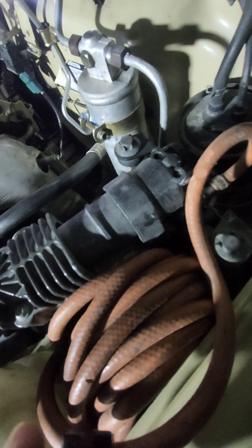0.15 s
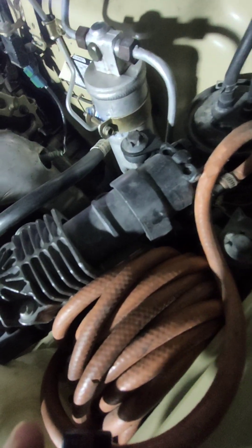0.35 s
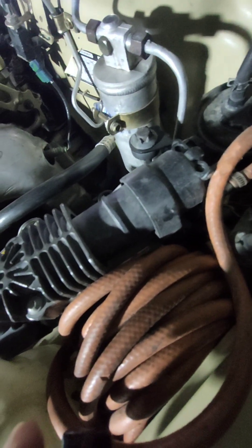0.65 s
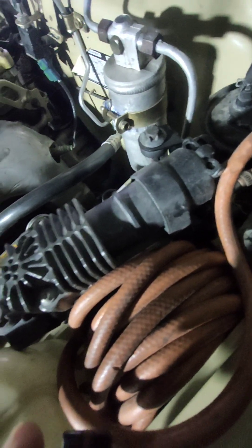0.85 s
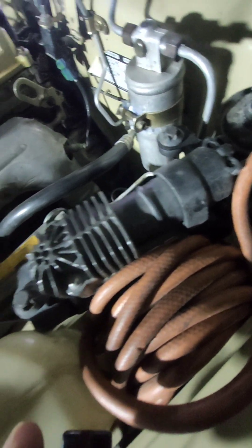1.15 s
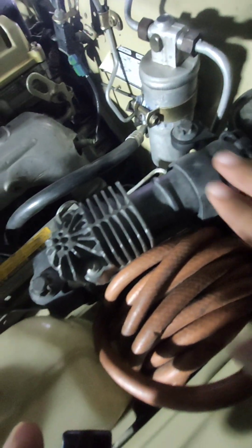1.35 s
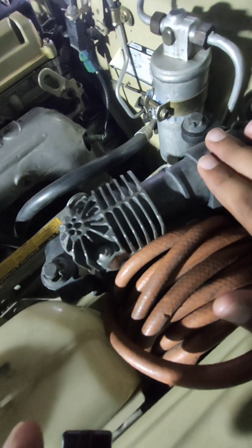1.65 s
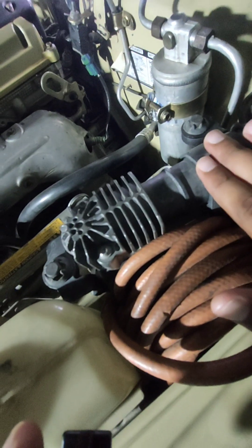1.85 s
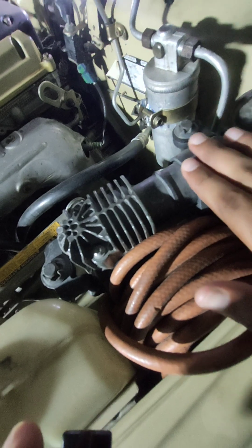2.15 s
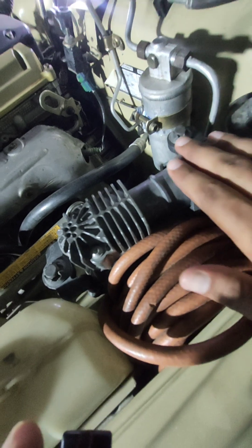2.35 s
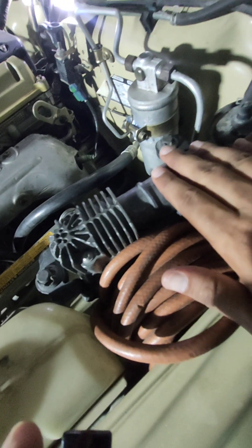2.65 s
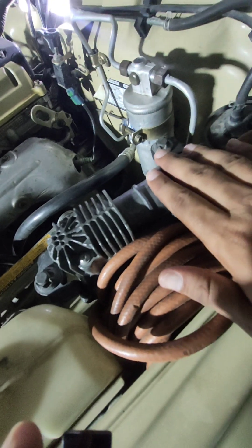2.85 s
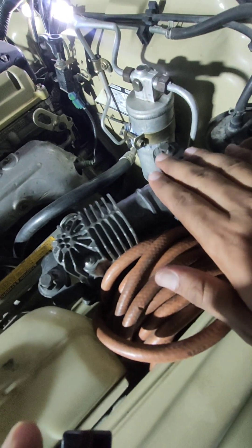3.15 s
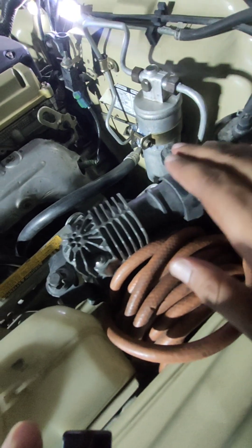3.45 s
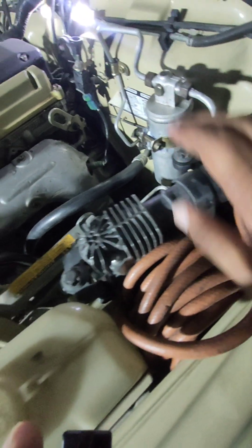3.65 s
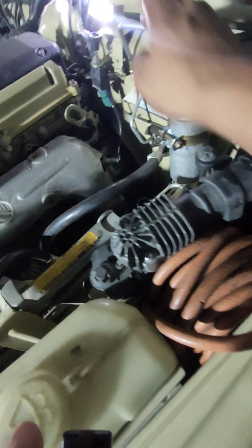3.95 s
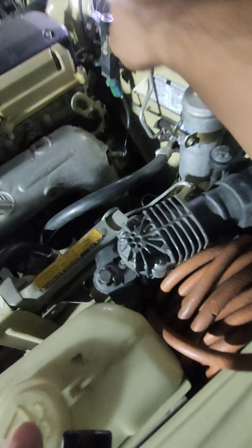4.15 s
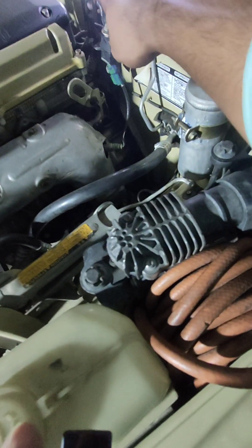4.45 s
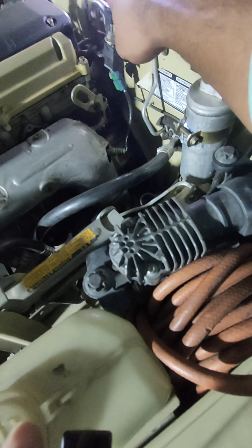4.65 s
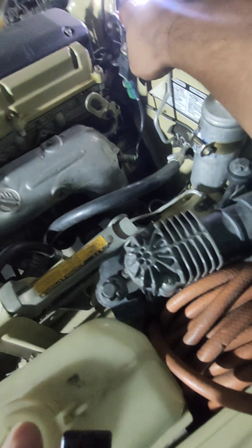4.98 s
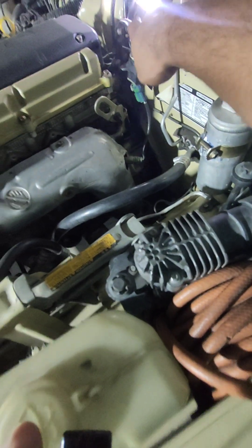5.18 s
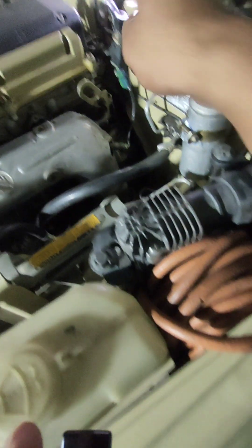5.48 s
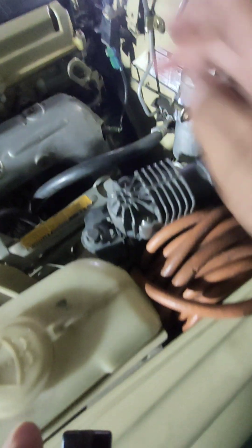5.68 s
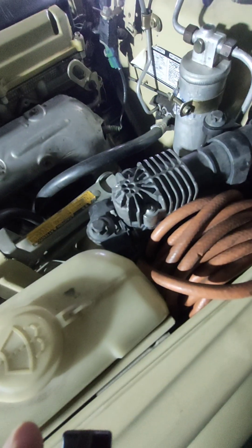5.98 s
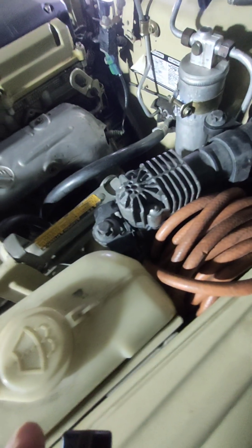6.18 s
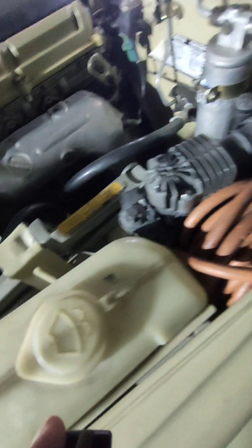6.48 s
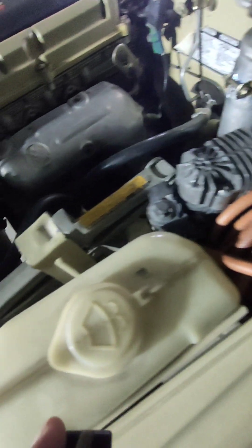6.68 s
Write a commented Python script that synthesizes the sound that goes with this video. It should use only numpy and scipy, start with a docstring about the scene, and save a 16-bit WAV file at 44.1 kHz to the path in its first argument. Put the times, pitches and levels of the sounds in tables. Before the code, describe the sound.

Loud air hiss over the rapid chugging buzz of a small compressor, cutting off with a soft thud into a quiet garage.

```python
"""A small electric piston compressor runs in a car's engine bay in a garage, heard from close above.
Its valves give a double puff on every turn, exciting the resonances of the pump head; the motor hums
and the casing rattles over a low throb. Escaping air makes a loud turbulent hiss that rings the metal.
After five seconds the pump stalls with a soft thud and the hiss shuts off, leaving a few small
handling sounds, a far engine and the faint noise of the garage."""
import sys
import numpy as np
from scipy import signal
from scipy.fft import rfft, irfft, next_fast_len
from scipy.io import wavfile

SR = 44100
rng = np.random.default_rng(int(sys.argv[2]) if len(sys.argv) > 2 else 0)


def transcribe(signal):
    """Save signal, clipped to [-1, 1], as a 16-bit WAV file at the path in sys.argv[1]."""
    frames = np.atleast_2d(signal).T
    limited = np.clip(frames, -1, 1)
    pcm = np.round(limited * 32767).astype(np.int16)
    wavfile.write(sys.argv[1], SR, pcm)


N = 300762
TIME = np.arange(N) / SR
HZ = np.maximum(np.fft.rfftfreq(N, 1 / SR), 1)
STALL_S = 4.87
GEAR_RATIO = 3.365  # motor turns per crank turn
PORT_LAG_S = .00014  # sound reaches the microphone's left port first


# Crank speed before the run-down: time_s, speed_hz
CRANK_SPEED = [(0.0, 43.443), (0.3, 43.616), (0.62, 43.551), (1.0, 43.992), (1.4, 44.14), (1.9, 43.973),
               (2.45, 44.113), (3.1, 44.109), (3.55, 44.241), (3.95, 44.482), (4.25, 44.388),
               (4.45, 45.023), (4.65, 45.43), (4.87, 44.713)]

def compressor(coast_s=0.096, puff_coast_s=0.088, start_turn=.122):
    """Periodic forcing: one crank times valves and casing; its speed decays exponentially at the stall."""
    effort = np.exp(-since(STALL_S) / coast_s)
    turns = start_turn + np.cumsum(effort * in_time(CRANK_SPEED)[0]) / SR
    puff_fade = np.exp(-(since(STALL_S) / puff_coast_s) ** 2)
    valves = amp(heard_db(-37.5, falloff=1)) * valve_puffs(turns) + valve_snaps(turns)
    return puff_fade * valves + effort * (casing(turns) + throb()) + stall_thud() + air_jet(turns)


# Modes of the pump head: centre_hz, width_hz, level_db, pan_db
HEAD_MODES = [(1022, 31, -19, 9.5), (1375, 145, -3.5, 14.5), (1600, 140, -1, 1), (1804, 1100, -10, 20.5),
              (1885, 115, -.5, 13), (1978, 206, -8.5, -7.5)]
# Cavities between pump, panels and a reaching arm: peak_s, spread_s, centre_hz, width_hz, level_db, pan_db
CAVITIES = [(.8, 0.32, 1850, 220, -15, -25), (3.5, 0.75, 1446, 300, -13.5, 7),
            (3.947, 0.45, 1994, 200, -9, 6), (4.11, 0.23, 1105, 35, -12.5, 2),
            (4.5, 0.32, 1182, 70, -14, 10), (4.7, 0.61, 1280, 131, -3.5, 5),
            (4.701, 0.21, 2074, 169.7, -7, -4)]

def valve_puffs(turns, gap_s=0.001735, jitter_s=.000014, uneven_db=0.5):
    """Impulse excitation: two opposite puffs per turn ring head and cavities, and echo round the bay."""
    strokes = TIME[1:][np.diff(np.floor(turns)) > 0]
    chance = rng.standard_normal((len(strokes), 4))
    puffs = np.zeros(N)
    for k, (lead_s, sign) in enumerate([(gap_s, -1), (0, 1)]):
        at = ((strokes - lead_s + jitter_s * chance[:, k]) * SR).astype(int)
        puffs[at] += sign * amp(uneven_db * chance[:, k + 2])
    puffs += air_rasp(puffs, strength=0.025, decay_s=0.0014)
    puffs = cut(cut(puffs, 1460, "high", order=5), 2100, "low", order=4)
    head = unit(sum(pan(side) * amp(db) * unit(resonate(puffs, hz, width))
                    for hz, width, db, side in HEAD_MODES))
    for peak_s, spread_s, hz, width, db, side in CAVITIES:
        cavity = resonate(resonate(puffs, hz, width), hz, width)
        head += amp(db) * swell(peak_s, spread_s) * unit(pan(side) * cavity)
    head[1] = np.interp(TIME - PORT_LAG_S / 2, TIME, head[1])
    return unit(head + amp(-8) * echoes(head, t60_s=0.074, delay_s=0.0011))


# Modes of the outlet valve: centre_hz, width_hz, level_db, pan_db, lead_s
VALVE_MODES = [(2610, 1430, -49.5, 13, 0.00101), (2714, 260, -48.5, -18, 0.000065),
               (3890, 1100, -47, -9, .0006)]

def valve_snaps(turns, uneven_db=0.5):
    """Impact: the outlet valve snaps shut once a turn and rings, with a short spit of air."""
    closings = np.diff(np.floor(turns), prepend=0) * amp(uneven_db * rng.standard_normal(N))
    closings += air_rasp(closings, strength=0.11, decay_s=.0006)
    out = 0
    for hz, width, db, side, lead_s in VALVE_MODES:
        ring = resonate(resonate(closings, hz, width), hz, width)
        out += amp(db) * unit(pan(side) * np.interp(TIME + lead_s, TIME, ring))
    facing_db = 5.5 * swell(3.48, 0.13)  # the microphone briefly faces the pump head
    return out * amp(heard_db(facing_db, falloff=1.2))


def air_rasp(pulses, strength, decay_s):
    """Flow noise: an exponentially decaying burst of air follows each pulse."""
    envelope = signal.lfilter([1], [1, -np.exp(-1 / (decay_s * SR))], abs(pulses) + 1e-18)
    return strength * rng.standard_normal(N) * envelope


# Shaking of the casing: crank_harmonic, level_db
SHAKE_HARMONICS = [(3, -1.5), (4, -3), (5, -1.5), (6, 0), (7, -3), (8, -13.5), (9, -9), (10, -1.5),
                   (11, -6), (12, -5.5), (13, -3.5), (14, -13.5), (15, -7)]
# Rattle of loose parts: frequency_hz, density_db
RATTLE_SPECTRUM = [(30, -15), (75, -12.5), (115, -7), (150, -4), (200, -11), (310, 3.5), (420, -5.5),
                   (540, -7.5), (720, -7.5), (1100, -24)]
# A rough resonance of the casing: centre_hz, width_hz, level_db, pan_db
CASING_MODE = (348.5, 83, -1.5, 10.5)

def casing(turns, hum_rise_s=0.089):
    """Forced vibration: the crank shakes the casing, the geared motor hums, loose parts rattle."""
    shake = sum(amp(db + 2 * drift(3.73)) * np.sin(2 * np.pi * (k * turns + rng.random()))
                for k, db in SHAKE_HARMONICS)
    rotor_phase = 2 * np.pi * GEAR_RATIO * turns + 0.201 * drift(4)
    hum_db = heard_db(-43.5, falloff=8.4) - 10 * np.exp(-TIME / hum_rise_s)  # strong only very close
    hum = amp(hum_db + drift(2.97)) * np.sin(rotor_phase)
    overtone = amp(-3 + 1.24 * drift(7.1)) * np.sin(2 * rotor_phase)
    rattle = amp(-3) * coloured(RATTLE_SPECTRUM)
    buzz = amp(heard_db(-48, falloff=0.96)) * (overtone + rattle)
    body = amp(heard_db(-53.5, falloff=4)) * ringing_noise([CASING_MODE], coherence=0.94)
    return pan(1.7) * (hum + amp(-60.5) * shake + buzz + body)


# Rocking of the pump on its feet: pitch_hz, level_db
ROCKING_MODES = [(158, -47), (262, -45)]
# Thud of the stopping pump: frequency_hz, density_db
THUD_SPECTRUM = [(60, -37), (115, -12), (158, -6), (205, -4), (262, -1), (310, 1), (450, -8), (1000, -13),
                 (2500, -42)]

def stall_thud():
    """Reaction force: the stopping piston rocks the pump on its feet with a soft thud."""
    rocking = sum(amp(db) * np.sin(2 * np.pi * (hz * TIME + rng.random())) for hz, db in ROCKING_MODES)
    return swell(4.958, 0.031) * (rocking + amp(-43.5) * coloured(THUD_SPECTRUM))


# Broad hiss of the jet: frequency_hz, left_db, right_db
JET_SPECTRUM = [(100, -41.5, -39), (861, -24, -21), (1270, -13.5, -15.5), (1950, -8.5, -5.5),
                (2330, -9.5, -10), (2700, -5.5, -3.5), (3200, -4.5, -5.5), (3600, -9, -1), (4100, -5.5, -3),
                (4850, -6, -5), (6200, -6.5, -10.5), (7800, -7, -13.5), (10140, -2, -12.5),
                (10800, -8, -21), (12600, -13.9, -19), (13640, -17.5, -18), (15600, -15.5, -17.5)]

def air_jet(turns, sag_s=4.96, sag_db_per_s=60, shut_s=5.025, shut_db_per_s=1600, coherence=0.34):
    """Turbulence: escaping air hisses, lightly chopped by the motor, until the flow sags and shuts off."""
    broad = amp(heard_db(-31.5, falloff=1)) * noise(spectrum_gain(JET_SPECTRUM), coherence, PORT_LAG_S)
    hiss = panel_reflections(broad + metal_resonances(coherence))
    flow_db = -sag_db_per_s * since(sag_s) - shut_db_per_s * since(shut_s)
    flutter_db = 0.62 * drift(74)
    chop_db = 0.8 * np.sin(2 * np.pi * GEAR_RATIO * turns)
    hiss *= amp(flow_db + flutter_db + chop_db)
    # the middle of the hiss lingers in the metal
    metal = resonate(rng.standard_normal(N), hz=4030, width_hz=2600)
    metal = unit(cut(metal, 6500, "low", order=4))
    return hiss + echoes(amp(-48 + flow_db) * metal, t60_s=0.42, delay_s=0.00275)


# Modes of the metal round the jet: centre_hz, width_hz, level_db, pan_db, falloff
METAL_MODES = [(3700, 430, -39, 6, 0.4), (4160, 530, -33.5, -15.5, 1.5), (5260, 323, -30.5, -21.5, 1),
               (5666, 460, -33.5, -18.5, -0.96), (6740, 338, -35.5, 16, 9.5), (7460, 481, -34.5, 9, 3),
               (8220, 690, -28.0, 24, 4), (8850, 283, -27.5, 20.5, 3.5), (9295, 299, -31, 22.5, 3)]
# Resonances that pass as microphone and hand move:
# peak_s, spread_s, centre_hz, glide_hz_per_s, width_hz, level_db, pan_db
PASSING_MODES = [(0.311, 0.475, 4140, -76.5, 252, -32.5, -8.5), (0.61, 0.48, 3636, -70, 327, -37.5, -2.5),
                 (0.629, 0.67, 6150, 96.5, 752, -30.5, 14), (1.11, 0.3, 8340, -158, 443, -26, 27.5),
                 (1.611, 0.6, 4510, -12, 152, -33.5, -4.5), (1.72, 0.407, 7310, -72, 287, -36.5, 5.5),
                 (1.771, 0.36, 6450, -32, 158, -46.5, -4), (1.819, 0.7, 5690, 50, 373, -29.5, -24),
                 (2.03, 0.37, 8140, -88, 242, -27.5, 30), (2.78, 0.41, 9080, 4, 255, -41, 12),
                 (2.814, 0.58, 4213, 97, 354, -30, -15), (2.85, 0.45, 8120, 172, 339, -40, 4),
                 (2.88, 0.58, 6840, 20, 340, -32, 20), (3.02, 0.52, 7297, 21, 322, -34, 1),
                 (3.16, 0.38, 7830, 66, 388, -32.7, 18), (3.39, 0.51, 3940, -16, 468, -39, 15),
                 (3.528, 0.12, 5670, 174, 770, -31, -9), (3.902, 0.39, 8260, 451, 509, -30, 16),
                 (3.928, 0.081, 6570, 869, 244, -34.0, 8.5), (3.96, 0.44, 4580, -47, 194, -36.5, -3),
                 (4.544, 0.62, 5700, -63, 395, -31, -16), (4.59, 0.55, 6560, 55, 330, -33, 1),
                 (4.66, 0.31, 9290, -24, 114, -47, 21), (4.69, 0.25, 8300, 23, 338, -36.5, 5),
                 (4.74, 0.4, 4600, -29, 224, -35, -4), (4.8, 0.3, 7480, 40, 298, -37, -2)]

def metal_resonances(coherence):
    """Broadband excitation: eddies ring the metal; some resonances stay, others swell, slide and fade."""
    eddies = [noise(1, coherence, PORT_LAG_S) for _ in range(4)]  # neighbours get different eddies
    eddies = [eddy / eddy.std() for eddy in eddies]
    out = 0
    for k, (hz, width, db, side, falloff) in enumerate(METAL_MODES):
        out += amp(heard_db(db, falloff)) * sliding_band(eddies[k % 2], np.full(N, hz), width, side)
    for k, (peak_s, spread_s, hz, glide, width, db, side) in enumerate(PASSING_MODES):
        on = abs(TIME - peak_s) < 3 * spread_s
        centre_hz = hz + glide * (TIME[on] - peak_s)
        band = sliding_band(eddies[2 + k % 2][:, on], centre_hz, width, side)
        out[:, on] += amp(db) * swell(peak_s, spread_s)[on] * band
    return out


def panel_reflections(x, strength=0.16, sway_s=.00008, count=5):
    """Comb filtering: panels return copies whose delays sway with the hand-held microphone."""
    out = x.copy()
    for side in range(2):
        for delay_s in np.linspace(.0012, .0065, count) * rng.uniform(.85, 1.15, count):
            path_s = delay_s + sway_s * np.interp(TIME, np.arange(8), rng.standard_normal(8))
            out[side] += strength * np.interp(TIME - path_s, TIME, x[side], left=0)
    return out / np.sqrt(1 + count * strength ** 2 * 0.32)


# The microphone draws back from the pump: time_s, distance_m
MIC_DISTANCE = [(0, 0.29), (.8, 0.29), (1.45, 0.33), (2.3, 0.33), (2.85, 0.37), (3.6, 0.37), (4.9, 0.4)]

def heard_db(db, falloff, reference_m=.3):
    """Distance law: pressure falls as 1 / distance ** falloff; a falloff of 1 is spherical spreading."""
    return db - falloff * 20 * np.log10(in_time(MIC_DISTANCE)[0] / reference_m)


# Overtones of the low throb: harmonic, level_db
THROB_HARMONICS = [(3, -32), (4, -6.5), (5, -5), (6, -1), (7, -9.5), (8, -9.5), (9, -12.5), (11, -12.5),
                   (12, -4.5), (13, -12), (15, -14)]

def throb(rate_hz=28.8, rise_s=0.24, fade_s=2.26, fade_db_per_s=17.5):
    """Missing fundamental: overtones beat at their common spacing, build up, then die away."""
    cycles = rate_hz * TIME + 0.017 * drift(3.3)
    tones = sum(amp(db + 4 * drift(4)) * np.sin(2 * np.pi * (k * cycles + rng.random()))
                for k, db in THROB_HARMONICS)
    rise = 1 - np.exp(-TIME / rise_s)
    return rise * amp(-50 - fade_db_per_s * since(fade_s)) * tones


# Strokes of hand and sleeve: peak_s, level_db, spread_s
BRUSH_STROKES = [(5.437, -65, 0.021), (5.48, -53.5, 0.013), (6.1, -70, 0.027), (6.66, -63.5, 0.046)]
# Their friction noise: frequency_hz, density_db
BRUSH_SPECTRUM = [(200, 1.5), (650, 1.5), (1400, -9), (5000, -6), (9000, -18), (15000, -27)]
# Small ticks: start_s, level_db, centre_hz
DRY_TICKS = [(6.2345, -38, 3670), (6.7794, -39, 4300), (6.804, -45, 4100)]

def handling(tick_decay_s=0.0018):
    """Friction and damped transients: hand and sleeve brush softly among a few dry ticks."""
    strokes = sum(amp(db) * swell(peak_s, spread_s) for peak_s, db, spread_s in BRUSH_STROKES)
    out = strokes * coloured(BRUSH_SPECTRUM)
    for start_s, db, hz in DRY_TICKS:
        burst = rng.standard_normal((2, N)) * (TIME >= start_s) * np.exp(-since(start_s) / tick_decay_s)
        out += amp(db + 3.5) * resonate(resonate(burst, hz, width_hz=2600), hz, width_hz=3200)
    return out


# Revs of the far engine: time_s, pitch_hz, level_db
ENGINE_REVS = [(3.15, 105.6, -67), (3.35, 112.9, -49), (3.5, 122, -44), (3.7, 113, -62), (4.95, 129.3, -65),
               (5.1, 122.4, -51.5), (5.25, 112.3, -53.5), (5.4, 124.9, -56), (5.55, 150, -51),
               (5.8, 164, -53), (5.95, 156.6, -58), (6.08, 124, -55), (6.22, 123.3, -50), (6.42, 108, -55),
               (6.55, 108.4, -70.5)]
# Its timbre: harmonic, level_db
ENGINE_HARMONICS = [(1, -1), (2, -9.5), (3, -26.5), (4, -19), (5, -25.5), (6, -20.5), (7, -22), (10, -23),
                    (11, -28), (12, -23.5), (13, -25.5)]

def far_engine(waver=0.018):
    """Harmonic series: a distant engine's tone rises and falls with each rev, blurred by echoes."""
    pitch_hz, rev_db = in_time(ENGINE_REVS)
    phase = 2 * np.pi * np.cumsum(pitch_hz * (1 + waver * drift(18.7))) / SR
    tone = sum(amp(db + 2.5 * drift(18.2)) * np.sin(k * phase) for k, db in ENGINE_HARMONICS)
    tone *= amp(rev_db - 3.5)
    return tone + amp(-7) * echoes(tone, t60_s=0.53, delay_s=.02)[0]


def garage_reverb(near):
    """Reverberation: the garage returns a diffuse, band-limited tail of the compressor."""
    tail = echoes(near.mean(axis=0), t60_s=0.45, delay_s=0.0054)
    return amp(-15.5) * cut(cut(tail, 9100, "low", order=2), 2190, "high", order=1)


# Noise of the still garage: frequency_hz, density_db
AMBIENT_SPECTRUM = [(15, -48.5), (25, -30), (59, -15), (97, -7), (137, 3.5), (223, -11), (285, -5.5),
                    (503, -15.5), (1370, -23), (4490, -26.5), (5280, -26.5), (6210, -40.5), (7510, -30),
                    (10700, -42.5), (16000, -39)]
# Narrow bands in the background hiss: centre_hz, width_hz, level_db, pan_db
AMBIENT_BANDS = [(5130, 540, -70, -24), (7380, 520, -75, 2.5), (2080, 370, -76.5, -8),
                 (908, 240, -76.5, 8.5)]

def garage_ambience():
    """Noise floor: a broad, faint noise that dips briefly near the end, plus steady narrow bands."""
    level_db = -56 - 5 * swell(6.61, 0.14)
    return amp(level_db) * coloured(AMBIENT_SPECTRUM) + ringing_noise(AMBIENT_BANDS)


def amp(db):
    """Decibels to amplitude gain."""
    return 10 ** (np.asarray(db) / 20)


def unit(x):
    """Normalisation to rms 1; a stereo pair by the mean of its sides."""
    return x / np.sqrt(np.mean(np.atleast_2d(x).mean(axis=0) ** 2) + 1e-20)


def pan(db):
    """Stereo gains for a level difference, left minus right."""
    return amp(np.array([[db], [-db]]) / 2)


def swell(peak_s, spread_s):
    """Gaussian envelope."""
    return np.exp(-.5 * ((TIME - peak_s) / spread_s) ** 2)


def since(start_s):
    """Seconds elapsed after a moment; zero before it."""
    return np.maximum(TIME - start_s, 0)


def in_time(rows):
    """Linear interpolation of each column at every sample."""
    times, *columns = np.transpose(rows)
    return [np.interp(TIME, times, column) for column in columns]


def drift(rate_hz, hop=32):
    """Random modulation: low-passed noise of rms 1."""
    hz = np.fft.rfftfreq(next_fast_len(N // hop + 1, real=True), hop / SR)
    slow = irfft(rfft(rng.standard_normal(2 * len(hz) - 2)) / (1 + (hz / rate_hz) ** 4))
    return unit(np.interp(np.arange(N) / hop, np.arange(len(slow)), slow))


def spectrum_gain(rows):
    """Spectral envelope over log frequency, from one column of dB or one for each side."""
    hz, *sides = np.transpose(rows)
    return amp([np.interp(np.log(HZ), np.log(hz), db) for db in sides])


def noise(gain, coherence=0, lag_s=0):
    """Partly coherent stereo noise of rms 1, shaped by gain; the shared part lags on the right."""
    shared = rfft(rng.standard_normal(N)) * np.exp(-2j * np.pi * HZ * np.array([[0], [lag_s]]))
    separate = rfft(rng.standard_normal((2, N)))
    white = np.sqrt(1 - coherence) * separate + np.sqrt(coherence) * shared
    return unit(irfft(white * gain, N))


def coloured(rows, coherent_below_hz=450):
    """Diffuse noise of a tabled spectrum: long waves reach both sides alike."""
    return noise(spectrum_gain(rows), 1 / (1 + (HZ / coherent_below_hz) ** 2))


def ringing_noise(bands, coherence=0):
    """Power addition: noise in steep-sided resonances, each placed between left and right."""
    power = 0
    for hz, width, db, side in bands:
        shape = 1 / (1 + ((HZ - hz) / (width * 0.9)) ** 2) ** 3
        power += amp(db) ** 2 * pan(side) ** 2 / np.sum(pan(side) ** 2) * shape / shape.sum()
    return np.sqrt(power.sum()) * noise(np.sqrt(power), coherence, PORT_LAG_S)


def sliding_band(white, hz, width_hz, pan_db):
    """Heterodyne filter: a noise band whose centre follows a curve; total power 1 over both sides."""
    carrier = np.exp(2j * np.pi * np.cumsum(hz) / SR)
    band = 2 * np.real(carrier * cut(white * carrier.conj(), width_hz / 2, "low", order=2))
    return band * np.sqrt(SR / 2 / width_hz) * pan(pan_db) / np.linalg.norm(pan(pan_db))


def resonate(x, hz, width_hz):
    """Two-pole resonance with peak gain 1."""
    radius = np.exp(-np.pi * width_hz / SR)
    feedback = [1, -2 * radius * np.cos(2 * np.pi * hz / SR), radius ** 2]
    return signal.lfilter(np.array([1, 0, -1]) * (1 - radius ** 2) / 2, feedback, x + 1e-18)


def cut(x, hz, kind, order):
    """Maximally flat high- or low-pass."""
    return signal.sosfilt(signal.butter(order, hz, kind, fs=SR, output="sos"), x)


def echoes(x, t60_s, delay_s):
    """Convolution with dense, decaying reflections of unit energy, different on each side."""
    t = TIME[:SR]
    tail = rng.standard_normal((2, SR)) * np.exp(-np.log(1000) * t / t60_s) * (t > delay_s)
    tail /= np.sqrt(np.mean(np.sum(tail ** 2, axis=1)))
    return signal.fftconvolve(np.atleast_2d(x), tail, axes=1)[:, :N]


def scene():
    """Superposition: the compressor and its reverberation over the quiet background."""
    near = compressor()
    return near + garage_reverb(near) + garage_ambience() + far_engine() + handling()


def record(dry, cutoff_hz=15900):
    """Band limiting: an elliptic low-pass cuts the top steeply."""
    return signal.sosfilt(signal.ellip(12, .1, 80, cutoff_hz, fs=SR, output="sos"), dry)


dry = scene()
out = record(dry)
transcribe(out)
```